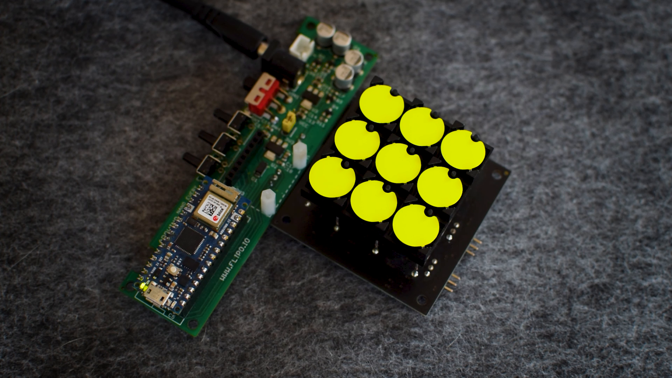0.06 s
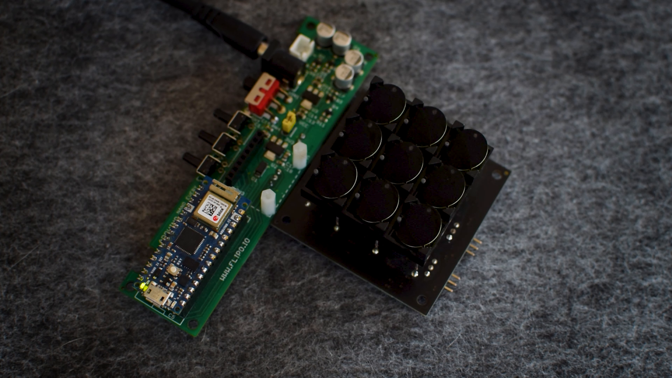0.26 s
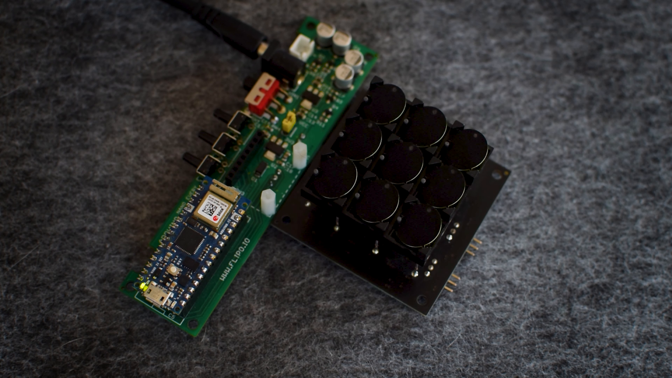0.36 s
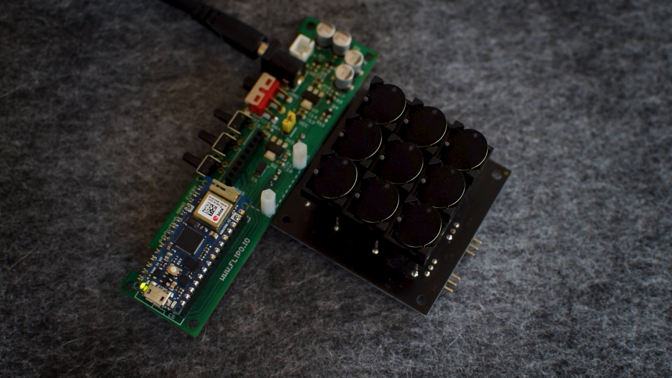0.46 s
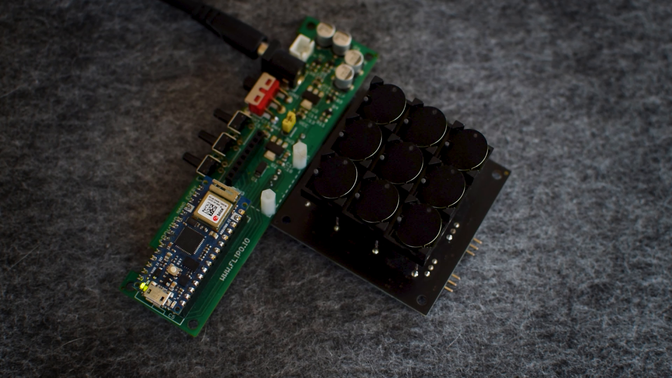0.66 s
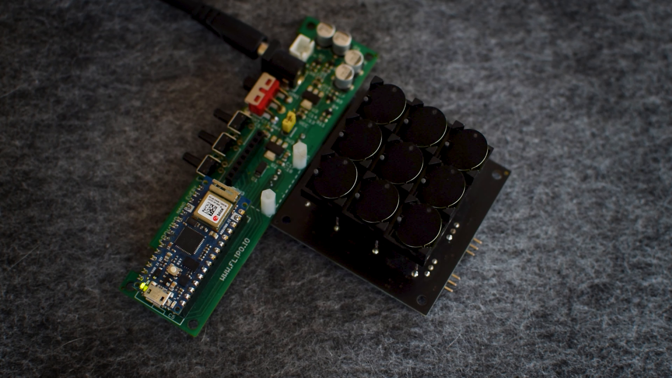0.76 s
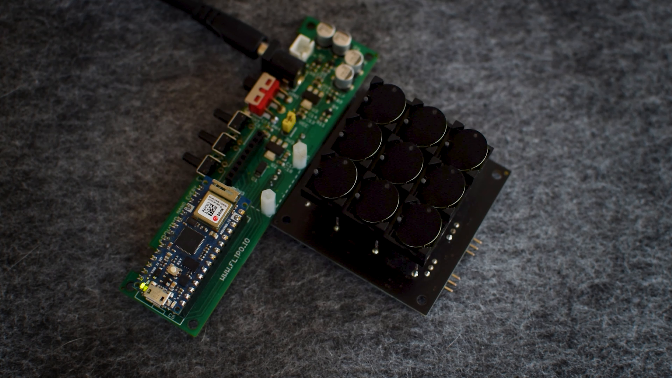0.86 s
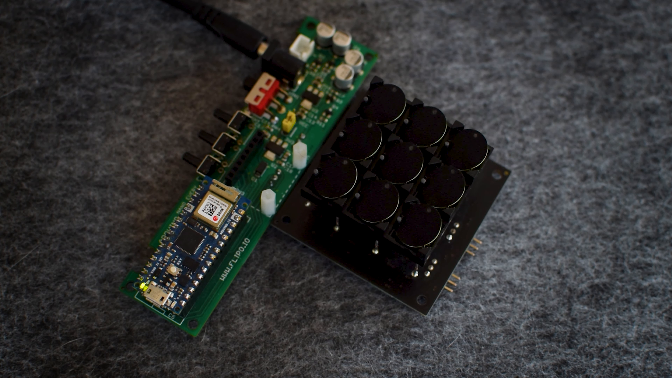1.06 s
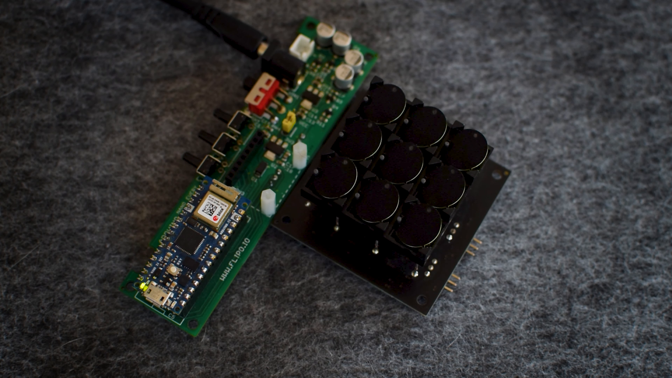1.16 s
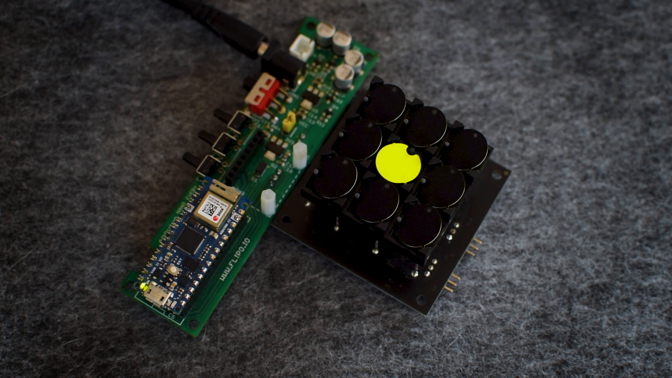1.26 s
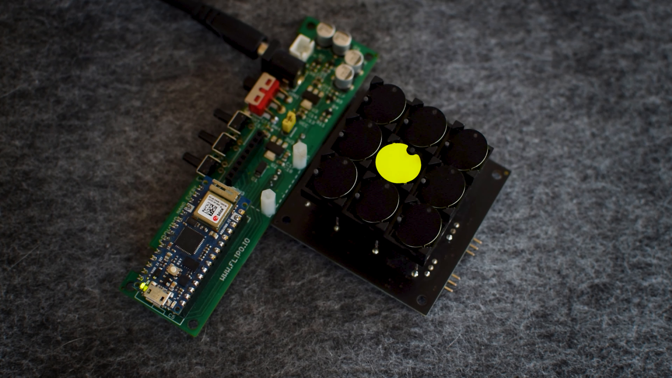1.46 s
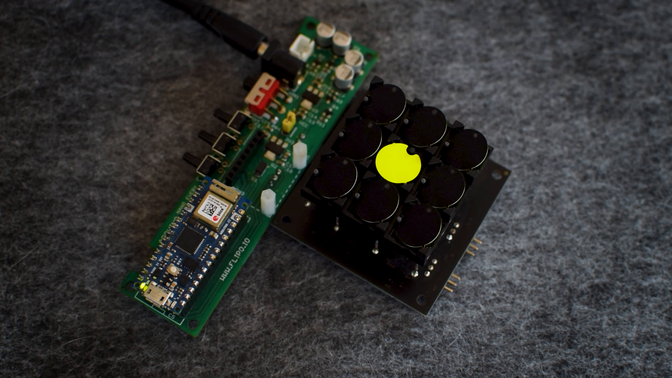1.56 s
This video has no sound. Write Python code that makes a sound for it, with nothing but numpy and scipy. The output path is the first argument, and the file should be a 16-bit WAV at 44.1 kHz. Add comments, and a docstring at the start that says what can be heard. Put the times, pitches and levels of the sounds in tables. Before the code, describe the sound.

A brief clatter of tiny display discs flipping, followed a second later by one sharp click.

```python
"""A small flip-disc display stands on a table over the low rumble of a quiet room. At 0.2 s coil pulses
kick nine discs loose in one quick ripple of ringing ticks, and the discs chatter in their pivots as
they swing. About 50 ms later they snap against their stops, some bouncing, and the table thuds softly.
A second later a single disc turns back. Every blow sets the circuit board ringing and leaves a faint
reverberation."""
import sys
import numpy as np
from scipy import signal
from scipy.fft import rfft, irfft, next_fast_len
from scipy.io import wavfile

SR = 44100
rng = np.random.default_rng(int(sys.argv[2]) if len(sys.argv) > 2 else 0)


def put_to_file(sound):
    """Save the sound as 16-bit audio at rate SR, in the file named by the first command-line argument."""
    columns = np.atleast_2d(sound).T  # one column per channel
    safe = np.clip(columns, -1, 1)
    whole_steps = np.round(safe * 32767)
    wavfile.write(sys.argv[1], SR, whole_steps.astype(np.int16))


N = 72765

# coil kicks that launch a disc: t/s, level/dB, board ring re the click/dB
COIL_KICKS = [(0.1995, -8, -2), (.2013, -3.5, -1), (0.2046, -7, 1), (0.2046, -4, -3), (0.2052, -5, -4),
              (0.2056, 4, -3), (0.209, -4.5, -4), (0.2094, -4.5, -3.5), (0.2107, -4, -3), (1.2324, -2, -20)]
# discs hitting their stops, bounces included: t/s, level/dB, board ring re the click/dB
LANDINGS = [(0.254, -3, -2), (0.2563, -4, 1.5), (0.2584, 1.5, 9), (0.2593, -2, 5.5), (.2619, 0, 0.5),
            (0.2636, -6, 4), (0.2663, -0.5, 4.5), (0.2676, -4.5, 6.5), (0.2691, -2, 4.5), (0.2799, -10, 7),
            (0.2827, -11.5, 4), (0.2864, -13.5, 3), (1.283, -0.5, -9), (1.3055, -16.5, 2.5)]


def amp(db):
    """Amplitude ratio of a level in decibels."""
    return 10 ** (np.asarray(db) / 20)


def along(points, hz):
    """Interpolation of (f/Hz, value) points on a logarithmic frequency axis."""
    f, value = np.transpose(points)
    return np.interp(np.log(hz + 1), np.log(f + 1), value)


def filtered(x, response):
    """Linear filtering: the spectrum of x times a complex frequency response."""
    n = x.shape[-1]
    padded = next_fast_len(n + 8192)
    return irfft(rfft(x, padded) * response(np.fft.rfftfreq(padded, 1 / SR)), padded)[..., :n]


def coloured(x, points, size=1024):
    """Minimum-phase filtering by (f/Hz, level/dB) points; folding the cepstrum makes it causal."""
    cepstrum = irfft(np.log(amp(along(points, np.fft.rfftfreq(size, 1 / SR)))))
    cepstrum[1:size // 2] *= 2
    cepstrum[size // 2 + 1:] = 0
    return signal.fftconvolve(x, irfft(np.exp(rfft(cepstrum))))[:len(x)]


def low_cut(x, hz, order):
    """High-pass filtering: the discs' ticks carry little sound at low frequencies."""
    return signal.sosfilt(signal.butter(order, hz, "high", fs=SR, output="sos"), x)


def envelope(t, t60, onset_s):
    """Damping: after a smooth rise, an exponential decay of 60 dB in t60 seconds."""
    return np.exp(-np.log(1000) * t / t60) * (1 - np.exp(-(t / onset_s) ** 2))


def burst(t, t60, onset_s=1e-6):
    """Exponentially damped noise of unit energy."""
    noise = rng.standard_normal(len(t)) * envelope(t, t60, onset_s)
    return noise / np.linalg.norm(noise)


def add(out, start_s, x):
    """Superposition of x on out from start_s."""
    part = out[..., round(start_s * SR):][..., :x.shape[-1]]
    part += x[..., :part.shape[-1]]


def spread(mid, side):
    """Sum and difference stereo: left and right from middle and side."""
    return np.array([mid + side, mid - side])


def room_tone():
    """Stationary background noise: a low rumble with a trace of hiss."""
    spectrum = [(12, -33.5), (20, -1.5), (53, 2), (74, -11.5), (133, -6), (161, -16.5), (202, -10.5),
                (298, -14), (324, -16.5), (393, -15), (614, -24), (705, -26), (15500, -39)]  # room tone: f/Hz, relative spectral level/dB
    side_over_mid = [(30, -0.5), (120, -2.5), (400, -2.5), (1500, -1.5), (10000, 1)]  # its width: f/Hz, level/dB
    mid, side = filtered(rng.standard_normal((2, N)), lambda hz: amp(along(spectrum, hz)))
    side = filtered(side, lambda hz: amp(along(side_over_mid, hz)))
    return amp(-65.5) / mid.std() * spread(mid, side) * amp([[0.17], [-0.17]])


def reverberation(x):
    """Diffuse field: a faint tail in which each frequency dies at its own rate."""
    decay_times = [(200, 0.33), (1000, 0.1), (3000, 0.24), (7000, .31), (10000, .26), (15000, 0.32)]  # reverberation time: f/Hz, T60/s
    colour = [(150, 5.5), (1500, 5), (4000, -4.5), (6500, -3.5), (9300, -2.5), (10400, -7.5), (15500, -6.5)]  # spectrum of the tail: f/Hz, level/dB
    bands, t, noise = signal.stft(rng.standard_normal((2, SR // 2)), SR, nperseg=256)
    decay = envelope(t, along(decay_times, bands)[:, None], onset_s=0.01)
    tail = signal.istft(noise * decay, SR)[1]
    wet = signal.fftconvolve(x[None], tail / np.linalg.norm(tail[0]), axes=1)[:, :N]
    return amp(-21) * filtered(wet, lambda hz: amp(along(colour, hz)))


def near_reflections(x):
    """Early scattering from the table and things on it, nearly the same in both channels."""
    t = np.arange(SR // 5) / SR
    mid, side = (signal.fftconvolve(x, burst(t, t60=0.07, onset_s=0.001))[:N] for _ in range(2))
    return amp(-18) * spread(mid, 0.2 * side)


def table_thuds():
    """Structure-borne sound: every landing shakes the table through the board."""
    colour = [(40, -3), (120, -2.5), (260, -3), (450, -3.5), (900, -25), (4000, -68.5)]  # spectrum of a thud: f/Hz, level/dB
    out, t = np.zeros((2, N)), np.arange(SR // 3) / SR
    for start_s, db, board_db in LANDINGS:
        thud = np.array([coloured(burst(t, t60=0.13, onset_s=0.0098), colour) for _ in range(2)])
        add(out, start_s, amp(-16 + db + board_db) * thud)
    return out


def pivot_chatter():
    """Contact noise: a swinging disc chatters in its pivots, the more when the board shakes."""
    colour = [(100, -31), (1000, -20), (2600, 3.5), (6000, -2.5), (11000, -7.5), (15500, -16)]  # spectrum of the chatter: f/Hz, level/dB
    peak_s, width_s = 0.02, 0.01
    out, t = np.zeros(N), np.arange(SR // 12) / SR
    for start_s, db, board_db in COIL_KICKS:
        noise = rng.laplace(size=len(t)) * np.exp(-((t - peak_s) / width_s) ** 2)
        chatter = coloured(noise / np.linalg.norm(noise), colour)
        add(out, start_s, amp(-11 + db + board_db) * chatter)
    return out


def ring(t, modes):
    """Free vibration: a sum of damped modes, scattered in tuning, level and sign at every blow."""
    hz, db, t60 = np.transpose(modes)[:, :, None]
    detune, scatter_db = 0.012, 1.2
    tune, level, sign = rng.standard_normal((3, len(modes), 1))
    waves = np.sign(sign) * np.sin(2 * np.pi * hz * (1 + detune * tune) * t)
    return (amp(db + scatter_db * level) * envelope(t, t60, onset_s=0.00017) * waves).sum(0)


def circuit_board(t):
    """Modal overlap: a few modes of the struck board ring apart, the many others merge into a clatter."""
    modes = [(807, -15, 0.0707), (1134, -6, 0.065), (1228, -10, 0.036), (1544, -7, 0.088),
             (1785, -11.5, .04), (2334, -5, .05), (2760, -4, .035), (3302, 4.5, 0.015), (3510, 7, .028),
             (3784, 5.5, .025)]  # distinct board modes: f/Hz, level/dB, T60/s
    clatter = [(100, -31), (850, -31.5), (1200, -11), (1900, -8.5), (2600, -3.5), (3450, 2), (4600, -4.5),
               (8000, -3), (15000, -16.5)]  # spectrum of the overlapping modes: f/Hz, level/dB
    return amp(-43) * ring(t, modes) + amp(-7) * coloured(burst(t, t60=0.097), clatter)


def clicks(blows, colour, modes, snap_db, rattle_db, rattle_t60):
    """Impulse response to each blow: a snap, a brief pivot rattle, and the ring of disc and board."""
    out, t = np.zeros((2, N)), np.arange(SR // 6) / SR
    ring_db, width = -28, 0.27
    snap = amp(snap_db) * coloured(1.0 * (t == 0), colour)
    for start_s, db, board_db in blows:
        mid, side = (amp(rattle_db) * coloured(burst(t, rattle_t60), colour)
                     + amp(ring_db) * ring(t, modes) for _ in range(2))
        board = amp(board_db) * circuit_board(t)
        add(out, start_s, amp(db) * spread(snap + mid + board, width * side))
    return out


def coil_kicks():
    """Impulsive excitation: a coil pulse kicks each disc loose, and it ticks in its free modes."""
    colour = [(100, -30), (950, -29), (1420, -14), (1950, -30), (2750, -22), (3700, 5.5), (4700, -5),
              (7500, 1), (9600, 3.5), (13000, -10.5), (15400, -4)]  # spectrum of a kick: f/Hz, level/dB
    modes = [(1416, -12, .028), (3770, -2, .014), (4020, -3, .012), (6072, -8, .02), (7273, -5, .045),
             (7750, -3, .022), (8070, -6, .022), (9270, -3, .022), (9825, -4, .02), (10640, -7, .02),
             (11200, -8, .02), (15380, 0, .014)]  # modes of a freed disc: f/Hz, level/dB, T60/s
    return clicks(COIL_KICKS, colour, modes, snap_db=-5.5, rattle_db=-1, rattle_t60=0.03)


def disc_landings():
    """Impact: each disc snaps against its stop and rings in the modes it has when seated."""
    colour = [(100, -13), (900, -29), (1380, -16.5), (1750, -30), (2300, -20), (3300, -9), (3900, -10),
              (6000, 3), (9500, 1.5), (12500, -4.5), (15500, -13.5)]  # spectrum of a landing: f/Hz, level/dB
    modes = [(1380, -11, .03), (3300, -3, .02), (5850, -5, .02), (6300, -5, .016), (7050, -5, .018),
             (7900, -1, .018), (8300, -1, .02), (8660, -4, .02), (9200, -3, .02), (11200, -8, .016)]  # modes of a disc against its stop: f/Hz, level/dB, T60/s
    return clicks(LANDINGS, colour, modes, snap_db=4, rattle_db=0, rattle_t60=0.032)


def scene():
    """Direct and reflected sound add; time and level differences set the display slightly to the left."""
    balance = [(300, 0.5), (1500, -0.5), (2800, -0.56), (5000, 1.24), (9000, .9)]  # up on the left and down on the right: f/Hz, level/dB
    lag_s = np.array([[0], [0.000012]])  # left, right
    kicks, landings = coil_kicks(), disc_landings()
    discs = low_cut(kicks + pivot_chatter(), hz=1200, order=3) + low_cut(landings, hz=750, order=2)
    mono = discs.mean(0)
    near = filtered(discs + near_reflections(mono), lambda hz: np.exp(-2j * np.pi * hz * lag_s))
    display = near + reverberation(mono) + table_thuds()
    return filtered(display, lambda hz: amp(spread(0, along(balance, hz)))) + room_tone()


def record(dry):
    """Band limiting: a steep low-pass at 16 kHz."""
    return filtered(dry, lambda hz: 1 / np.sqrt(1 + (hz / 16000) ** 160))


dry = scene()
out = record(dry)
put_to_file(out)
```